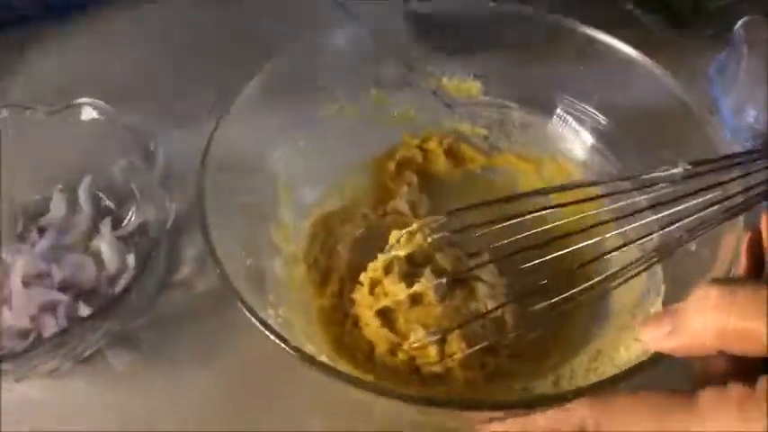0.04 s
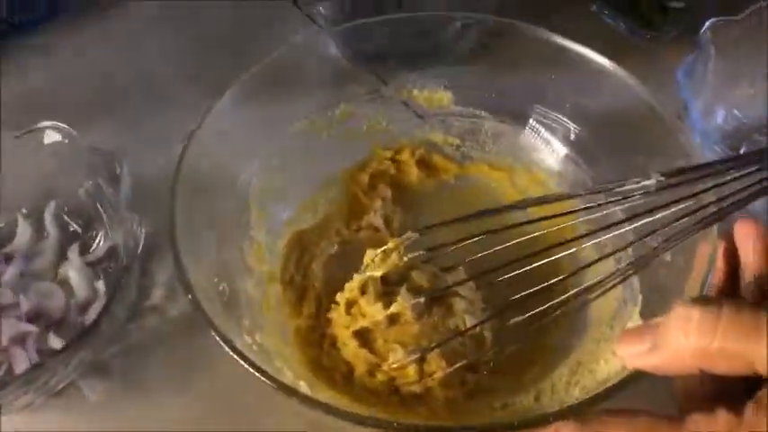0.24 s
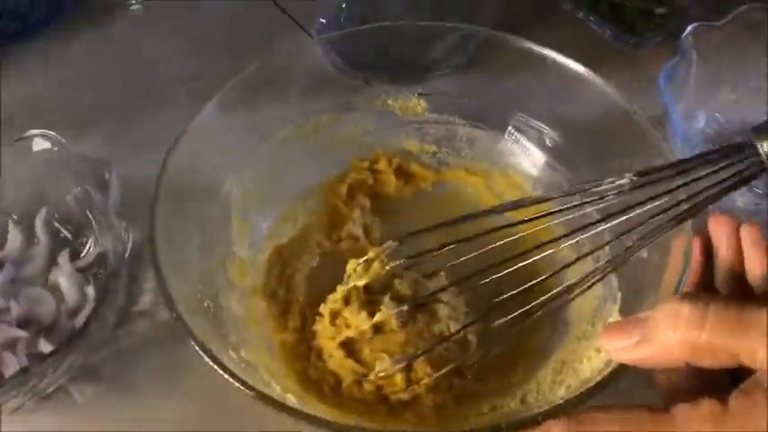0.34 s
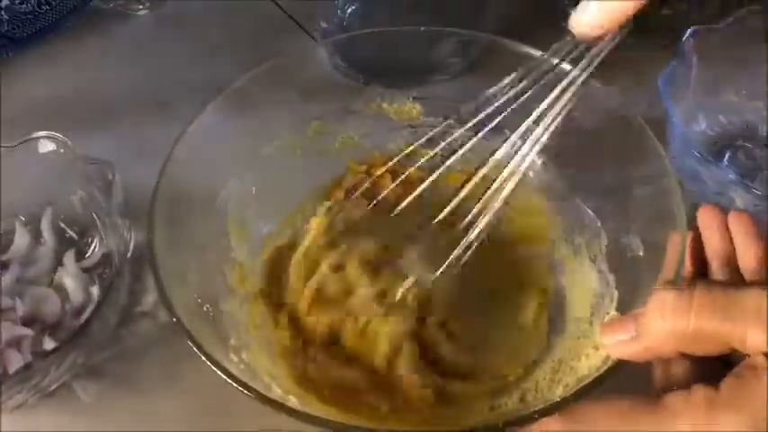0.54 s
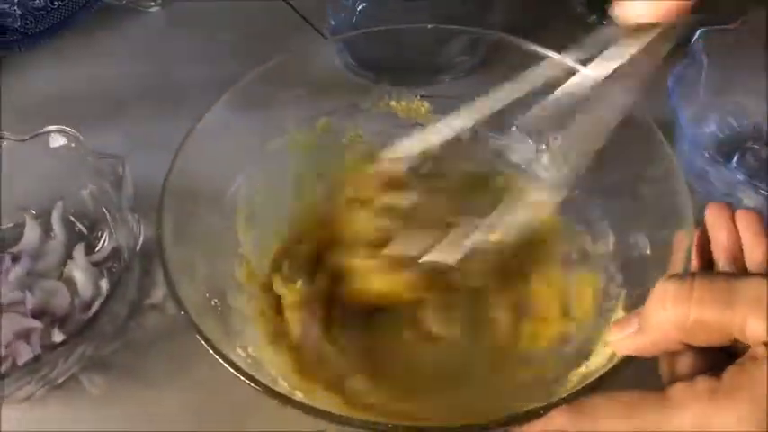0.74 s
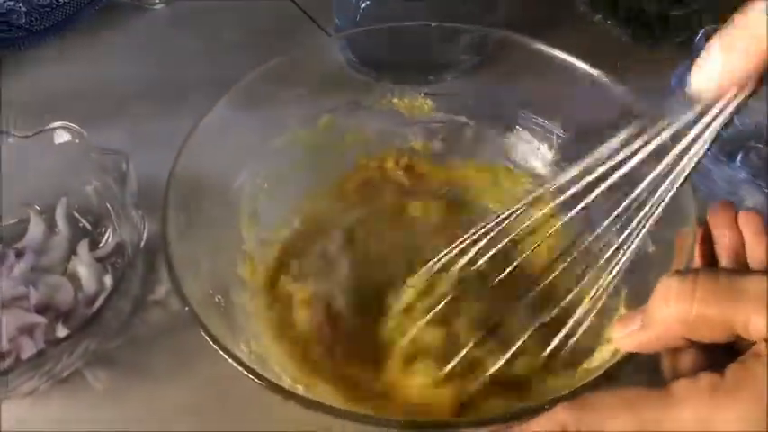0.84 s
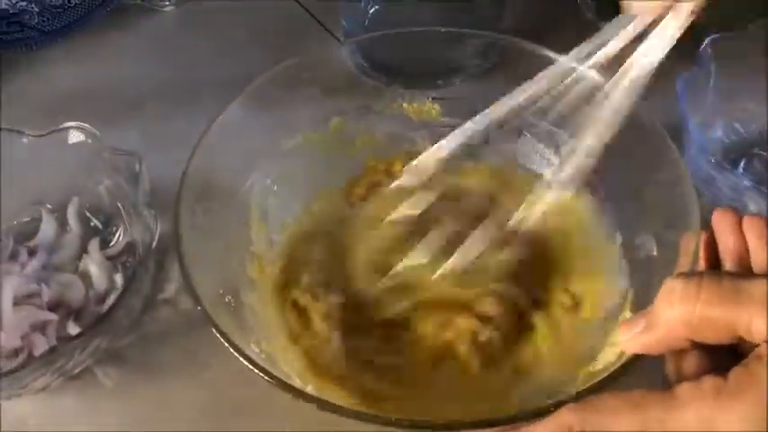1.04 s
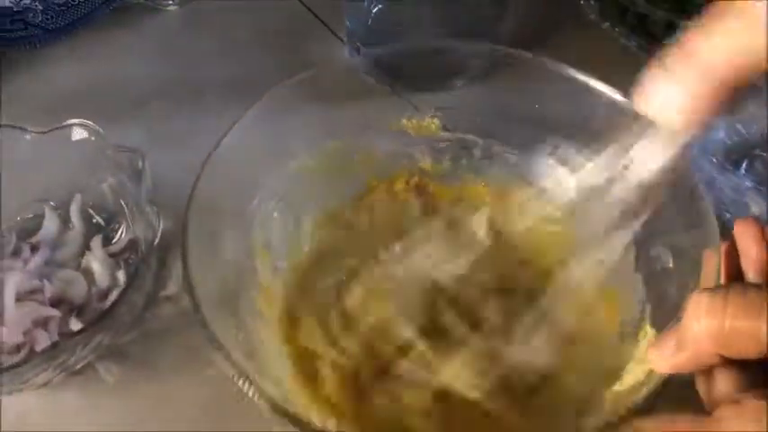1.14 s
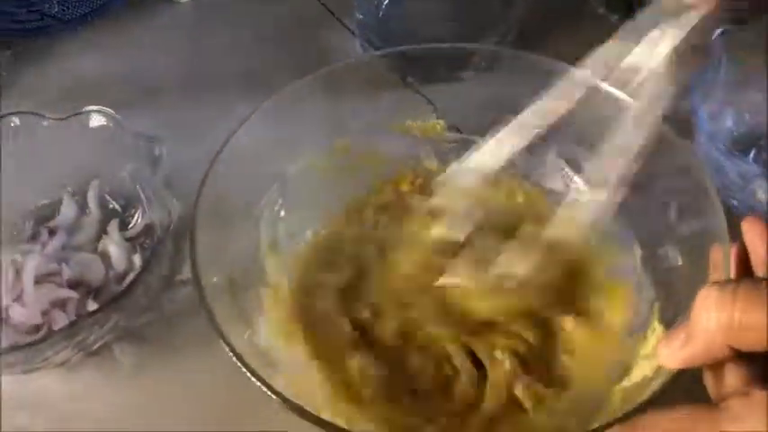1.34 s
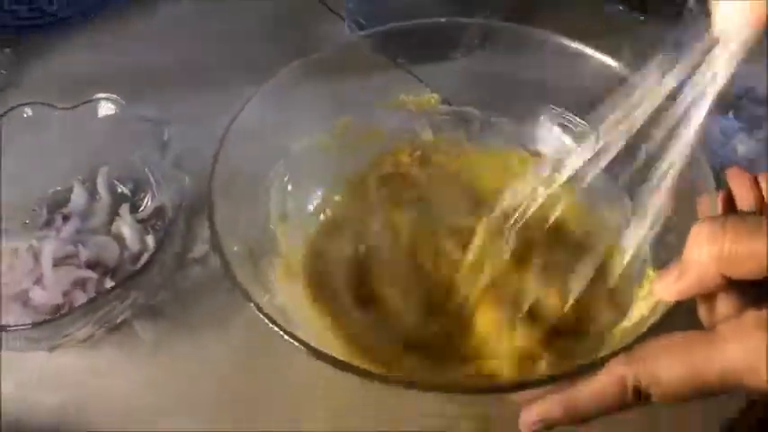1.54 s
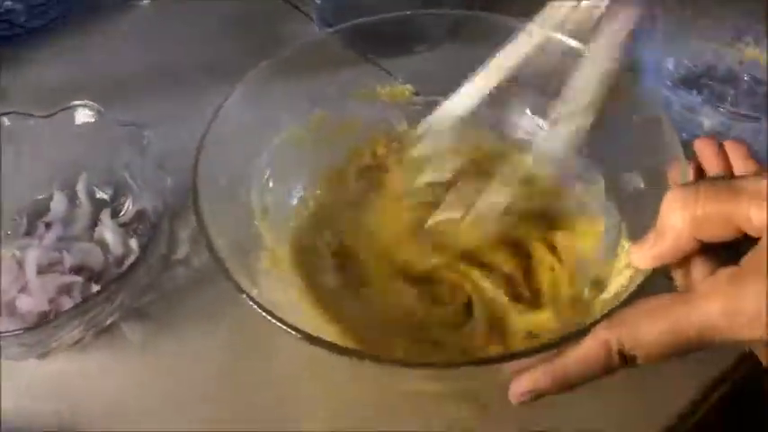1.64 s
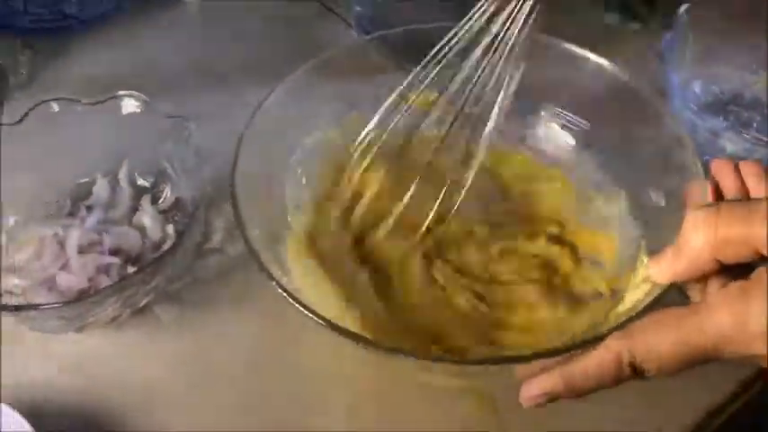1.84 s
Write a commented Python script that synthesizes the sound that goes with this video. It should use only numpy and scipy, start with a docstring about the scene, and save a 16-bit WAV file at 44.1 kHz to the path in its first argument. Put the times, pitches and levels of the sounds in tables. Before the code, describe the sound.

A wire whisk hits a glass bowl with two hard knocks, dull then bright, then stirs thick batter with fine ticks, faint scrapes and wet rustle; close microphone, small kitchen, quiet appliance hum behind.

```python
"""On a kitchen counter in a small room, a wire whisk beats thick batter in a glass bowl.
Two hard knocks, one dull and one bright, ring the hand-damped bowl as short decaying modes over noise.
Wires tick and scrape on the glass and hiss in the batter: noise bursts, short tones and swells.
The wet rustle of random grains and hiss grows, unevenly, as the stirring gathers pace.
Behind it an appliance hums: wavering sine tones over coloured air noise."""
import sys
import numpy as np
from scipy import signal
from scipy.fft import rfft, irfft, next_fast_len
from scipy.io import wavfile

SR = 44100
rng = np.random.default_rng(int(sys.argv[2]) if len(sys.argv) > 2 else 0)


def file_out(sig):
    """Save sig as 16-bit WAV at sys.argv[1]."""
    # one column per channel
    cols = np.atleast_2d(sig).T
    # limit, then scale
    lim = np.clip(cols, -1, 1)
    pcm = np.round(lim * 32767).astype(np.int16)
    wavfile.write(sys.argv[1], SR, pcm)


N = 83790
TIME = np.arange(N) / SR  # s


def from_db(db):
    """Decibels to gain."""
    return 10 ** (np.asarray(db) / 20)


def rms_one(x):
    """Scale to unit rms."""
    return x / np.sqrt(np.mean(x ** 2) + 1e-20)


def colour(x, points):
    """Minimum-phase filter through the given spectrum points; white noise keeps its power."""
    size = 2 * next_fast_len(len(x))
    hz, db = np.transpose(points)
    bins_hz = np.linspace(1, SR / 2, size // 2 + 1)
    gain = rms_one(from_db(np.interp(np.log(bins_hz), np.log(hz), db)))
    # folding the cepstrum forward in time makes the filter causal
    cepstrum = irfft(np.log(gain))
    cepstrum[1:size // 2] *= 2
    cepstrum[size // 2 + 1:] = 0
    response = np.exp(rfft(cepstrum))
    return irfft(rfft(x, size) * response)[:len(x)]


def butter_filter(x, order, edge_hz, kind):
    """Butterworth filter of the given kind."""
    return signal.sosfilt(signal.butter(order, edge_hz, kind, fs=SR, output="sos"), x)


def decay(s, t60):
    """Envelope that jumps to 1 at time s and falls 60 dB in t60 seconds."""
    return (TIME >= s) * np.exp(-np.log(1000) * np.clip((TIME - s) / t60, 0, 10))


def ring(s, hz, t60):
    """One mode struck at time s: a decaying sine."""
    return decay(s, t60) * np.sin(2 * np.pi * hz * (TIME - s))


def burst(s, t60):
    """The dense micro-impacts of one contact: decaying noise of random signs."""
    return decay(s, t60) * rng.choice([-1, 1], N)


def drift(rate):
    """Slow random motion: straight lines between normal draws, rate draws per second."""
    knots = rng.standard_normal(200)
    return np.interp(TIME * rate, np.arange(len(knots)), knots)


def struck_modes(s, db, modes, which):
    """Bank of modes struck together, with alternating signs, at the levels of one of the knocks."""
    out = 0
    for k, (hz, *levels_db, t60) in enumerate(modes):
        out = out + (-1) ** k * from_db(db + levels_db[which]) * ring(s, hz, t60)
    return out


def knocks():
    """Each knock cracks, rings the bowl, shakes the wires and thumps the counter."""
    # hard knocks, dull then bright: (time [s], gain on all modes [dB], crack [dB], rattle [dB],
    # thump before its band filter [dB])
    knock_events = [(0.227, -2, -23, -30.5, -42), (0.3967, -2.5, -17, -26, -40.5)]
    # broad resonances of the clack: (frequency [Hz], dull knock [dB], bright knock [dB], t60 [s])
    clack_modes = [(434, -31.5, -51, 0.0064), (880, -16, -28.5, 0.0055), (1270, -17.5, -18, 0.011),
                   (1600, -28, -16, 0.0097), (2046, -17.5, -15.5, 0.019), (2850, -19.5, -26, 0.015),
                   (3350, -22.5, -30, 0.0033), (4000, -28, -45, 0.0068), (5400, -33, -25.5, 0.0067),
                   (6380, -24, -40, 0.019), (7800, -28, -17, 0.014), (9880, -24, -9, .008),
                   (10370, -26.5, -13, 0.013), (11500, -26, -13.5, .008), (12200, -25, -21, 0.014)]
    # longer ring of the bowl: (frequency [Hz], dull knock [dB], bright knock [dB], t60 [s])
    bowl_modes = [(383, -34.5, -44.5, 0.098), (535, -37, -41, 0.13), (770, -43, -41.5, 0.088),
                  (848, -36, -38.5, 0.13), (1104, -51, -55, 0.073), (1167, -39, -50, 0.12),
                  (1294, -36, -37, 0.047), (1536, -32.5, -29.5, 0.07), (1590, -49, -39, 0.11),
                  (1720, -44, -59, 0.058), (2000, -42, -41, 0.068), (3100, -48, -35.5, 0.11),
                  (3454, -39.5, -50, 0.13), (3830, -45, -34, 0.099), (3760, -34, -73, 0.057),
                  (6322, -62, -43.5, 0.17), (7860, -59, -33, 0.034), (8756, -56, -42, 0.036),
                  (9767, -53, -46, 0.078), (10100, -62, -47, 0.07)]
    # colour of crack and rattle in the dull knock: (frequency [Hz], level [dB])
    dull_colour = [(60, -31), (230, -22), (380, -12), (900, -2), (2000, 2), (2500, -6.5), (4000, 1.5),
                   (4700, -4), (6500, -8.5), (9500, -8.5), (12600, -13), (13500, -20), (16000, -23)]
    # colour of crack and rattle in the bright knock: (frequency [Hz], level [dB])
    bright_colour = [(60, -29), (280, -28), (450, -23), (1000, -9), (1600, 2.5), (2100, -1.5), (2450, -7),
                     (3600, -9.5), (4700, -10.5), (7000, -6.5), (8800, -4), (10000, 0.5), (11500, -4.5),
                     (14000, -9.5), (16000, -16)]
    crack_t60_s, rattle_t60_s, rattle_delay_s = 0.016, 0.12, 0.0012
    thump_band_hz, thump_t60_s = [70, 260], 0.065
    clack_wet_db = -19

    out = 0
    for which, spectrum in enumerate((dull_colour, bright_colour)):
        s, db, crack_db, rattle_db, thump_db = knock_events[which]
        clack = struck_modes(s, db, clack_modes, which)
        bowl = struck_modes(s, db, bowl_modes, which)
        crack = from_db(crack_db) * burst(s, crack_t60_s)
        rattle = from_db(rattle_db) * burst(s + rattle_delay_s, rattle_t60_s)
        thump = from_db(thump_db) * butter_filter(burst(s, thump_t60_s), 1, thump_band_hz, "band")
        out = out + clack + room(clack, clack_wet_db) + bowl + colour(crack + rattle, spectrum) + thump
    return out


def wire_ticks():
    """Each tick is a bright snap and a very short ring of the wire, its attack softened by batter."""
    # wire ticks on the glass: (time [s], snap level [dB], ring level [dB], pitch [Hz])
    tick_events = [(0.048, -55, -43.5, 6220), (0.6003, -48.5, -46, 12400), (0.6322, -47.5, -50, 9300),
                   (0.6444, -50, -36.5, 6420), (0.683, -48, -46, 10400), (0.6912, -50, -45, 11000),
                   (0.6944, -46, -50, 11100), (0.7106, -32.5, -30.5, 6460), (0.7228, -29.5, -25.5, 8000),
                   (0.7287, -32, -26, 7570), (0.733, -48, -35, 9700), (0.7396, -52, -44, 10000),
                   (0.7557, -33, -47, 10600), (0.7869, -43, -45, 10500), (0.7963, -49, -45, 10000),
                   (0.8176, -38, -31.5, 6150), (0.8192, -32.5, -50, 10400), (0.867, -49, -45, 10400),
                   (0.8842, -43.5, -52, 10800), (0.9514, -38, -57, 10500), (1.0307, -45, -58, 12000),
                   (1.1115, -49, -52, 10640), (1.185, -49, -47, 9940), (1.2599, -35, -32.5, 10470),
                   (1.339, -39.5, -55, 10850), (1.35, -53, -43, 9200), (1.4167, -50, -54, 12000),
                   (1.4605, -47, -46, 9500), (1.4884, -52, -46, 10900), (1.494, -50, -43, 11500),
                   (1.4972, -45, -46, 9400), (1.5648, -47.5, -50, 10800), (1.569, -52, -49, 11000),
                   (1.642, -44.5, -40, 10700), (1.7139, -50, -46, 10800), (1.7206, -51, -50, 13200),
                   (1.7912, -42, -49, 10600)]
    # colour of the snaps: (frequency [Hz], level [dB])
    snap_colour = [(300, -35), (1200, -24), (3500, -16), (5100, -16.5), (6200, -6.5), (8500, -4),
                   (10000, 1), (11300, 2), (13000, -4), (16000, -11)]
    snap_t60_s, wire_t60_s, rise_s = 0.0085, 0.0078, 0.00015
    upper_ratio, upper_db = 1.245, -8.5  # second mode of a wire, relative to the first

    snaps = rings = 0
    for s, snap_db, ring_db, hz in tick_events:
        attack = np.clip((TIME - s) / rise_s, 0, 1)
        upper = from_db(upper_db) * ring(s, hz * upper_ratio, wire_t60_s)
        wire = ring(s, hz, wire_t60_s) - upper
        snaps = snaps + attack * from_db(snap_db) * burst(s, snap_t60_s)
        rings = rings + attack * from_db(ring_db) * wire
    return colour(snaps, snap_colour) + butter_filter(rings, 4, 5200, "high")


def bumps():
    """Cushioned contacts excite only a band in the midrange."""
    # dull bumps of the whisk through the batter:
    # (time [s], level [dB], centre pitch [Hz], half width [octaves])
    bump_events = [(0.241, -26, 1220, 0.74), (0.4366, -34, 1380, 0.52), (0.7415, -42, 1060, 0.48),
                   (0.8245, -51.5, 1040, 0.25), (0.8847, -48.5, 1800, 0.24), (0.887, -51, 990, 0.23),
                   (1.26, -43.5, 1580, 0.6), (1.3387, -51.5, 1210, 0.68), (1.715, -51.5, 1050, 0.21),
                   (1.7928, -48.5, 1000, 0.21)]
    bump_t60_s = 0.016

    out = 0
    for s, db, hz, octaves in bump_events:
        low, high = hz / 2 ** octaves, hz * 2 ** octaves
        make_up = np.sqrt(SR / 2 / (high - low))  # offsets the power lost outside the band
        thud = butter_filter(burst(s, bump_t60_s), 2, [low, high], "band")
        out = out + from_db(db) * make_up * thud
    return out


def scrapes():
    """Short rough slides of the wires along the glass, each waking one mode of the bowl."""
    # wires scrape the glass: (time [s], level [dB], t60 [s], ring of the bowl [dB])
    scrape_events = [(0.759, -56, .04, -64), (0.818, -51, .04, -64), (1.261, -54.5, .06, -53),
                     (1.465, -60, 0.19, -70), (1.562, -59.5, .1, -70), (1.715, -56, .1, -61),
                     (1.792, -62, 0.1, -65)]
    # colour of a scrape: (frequency [Hz], level [dB])
    scrape_colour = [(400, -22), (1050, 3), (1800, -9), (2700, 7.5), (3150, 4), (3550, 5.5), (4400, -9),
                     (6500, -2), (9000, -2), (16000, -5.5)]
    bowl_hz, bowl_t60_s = 3520, 0.092

    rough = bowl = 0
    for s, db, t60, ring_db in scrape_events:
        rough = rough + from_db(db) * burst(s, t60)
        bowl = bowl + from_db(ring_db) * ring(s, bowl_hz, bowl_t60_s)
    return colour(rough, scrape_colour) + bowl


def swishes():
    """A wire slides through wet batter: brief bell-shaped swells of very high hiss."""
    # swishes: (time of the peak [s], level [dB], length [s], two standard deviations of the bell)
    swish_events = [(0.69, -60, 0.011), (0.737, -55, 0.022), (1.495, -55, .014), (1.724, -51.5, 0.024)]

    swell = 0
    for s, db, length in swish_events:
        swell = swell + from_db(db) * np.exp(-(2 * (TIME - s) / length) ** 2 / 2)
    hiss = butter_filter(rng.standard_normal(N), 2, 10700, "high")
    return swell * rms_one(hiss)


def batter():
    """Tiny films of batter tear around the wires as random clicks, over a soft sliding hiss."""
    # stirring level of the wet rustle, before the trim: (time [s], level [dB])
    stir_level = [(0, -74), (0.2, -71), (0.5, -66), (0.67, -62), (0.76, -58), (0.9, -64.5), (1.1, -60.5),
                  (1.16, -63), (1.24, -59), (1.3, -60), (1.38, -59.5), (1.48, -63), (1.61, -60),
                  (1.7, -58.5), (1.73, -57), (1.755, -60), (1.84, -68), (1.9, -63.5)]
    # colour of the wet rustle: (frequency [Hz], level [dB])
    rustle_colour = [(500, -22), (1100, 1), (2500, -2), (3500, -6.5), (5000, -5.5), (7000, -6), (8500, -5),
                     (10500, 3), (12500, -1.5), (14000, -8.5), (16000, -7.5)]
    trim_db, grains_per_s, hiss_share = -2, 3600, 0.48
    flutter_db, flutter_per_s = 1.15, 51

    torn = rng.random(N) < grains_per_s / SR
    grains = rms_one(rng.choice([-1, 1], N) * torn)
    hiss = hiss_share * rng.standard_normal(N)
    wet = rms_one(colour(grains + hiss, rustle_colour))
    level_db = np.interp(TIME, *np.transpose(stir_level))
    return wet * from_db(trim_db + flutter_db * drift(flutter_per_s) + level_db)


def appliance():
    """Slightly wavering motor tones, some slowly rising or falling in level, over steady air noise."""
    # motor tones: (frequency [Hz], rms level at the start [dB], rise [dB/s])
    hum_tones = [(399.5, -64.5, 0), (448, -74.5, -1.5), (534.7, -82.5, 8), (652, -78.5, -5.5),
                 (782, -75.5, -3), (1170, -78, 1.5), (1211, -74.5, -1), (1370, -75, -6.5), (1823, -75.5, 0),
                 (2350, -97, 3), (2450, -91, 2), (12925, -85, 0)]
    # colour of the air noise: (frequency [Hz], level [dB])
    air_colour = [(25, -12), (70, -29), (110, -12.5), (170, -5.5), (230, -3.5), (310, -7), (390, 2),
                  (520, 2), (690, -2), (790, 5), (880, -1), (1100, 3.5), (1600, -3), (2050, -3.5),
                  (2700, -8), (4000, -11.5), (8000, -15), (16000, -17)]
    air_db = -63
    waver, waver_per_s = 0.099, 4.72  # phase spread [rad], with half that number as level spread

    out = from_db(air_db) * colour(rng.standard_normal(N), air_colour)
    for hz, db, rise_db in hum_tones:
        phase = 2 * np.pi * (hz * TIME + rng.random()) + waver * drift(waver_per_s)
        level = np.sqrt(2) * from_db(db + rise_db * TIME)  # rms to peak
        out = out + level * np.sin(phase) * (1 + waver / 2 * drift(waver_per_s))
    return out


def room(x, wet_db):
    """Dense, quickly dying reflections from the counter and near walls."""
    echoes = burst(0.0024, 0.09)  # delay and t60 [s]
    unit_echoes = echoes / np.sqrt(np.sum(echoes ** 2))
    return from_db(wet_db) * signal.fftconvolve(x, unit_echoes)[:N]


def scene():
    """The whisk and bowl in their room, with the batter's rustle and the hum behind."""
    tick_wet_db, bump_wet_db = -10.5, -13
    ticks = wire_ticks()
    thuds = bumps()
    contacts = knocks() + ticks + room(ticks, tick_wet_db) + thuds + room(thuds, bump_wet_db)
    whisk = contacts + scrapes() + swishes()
    return (whisk + batter() + appliance())[None]


def record(dry):
    """A steep low-pass at 16 kHz cuts the top."""
    low_pass = signal.ellip(10, 0.1, 70, 16000, fs=SR, output="sos")  # ripple, then rejection [dB]
    return signal.sosfilt(low_pass, dry)


dry = scene()
out = record(dry)
file_out(out)
```